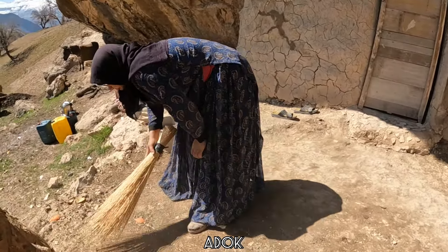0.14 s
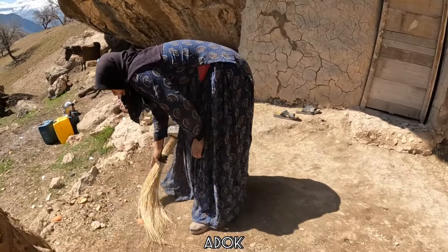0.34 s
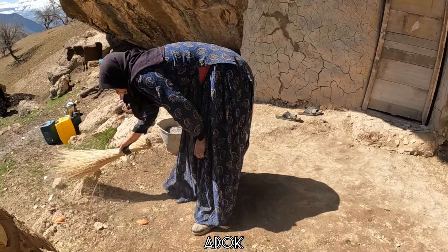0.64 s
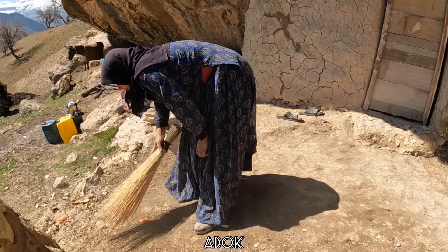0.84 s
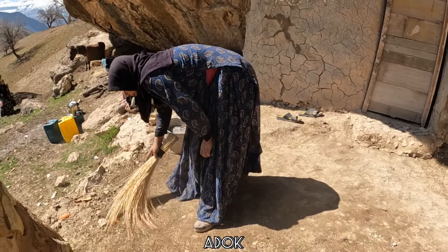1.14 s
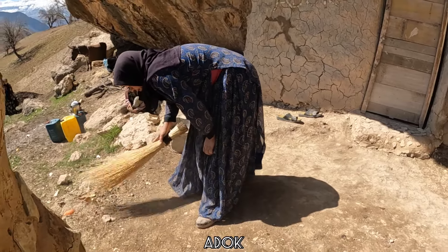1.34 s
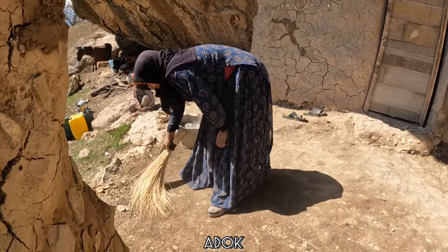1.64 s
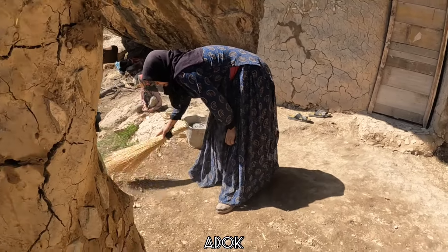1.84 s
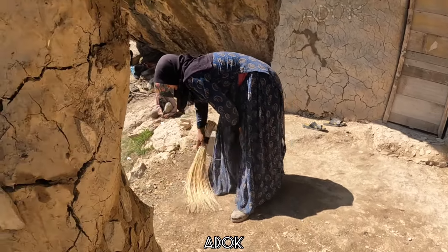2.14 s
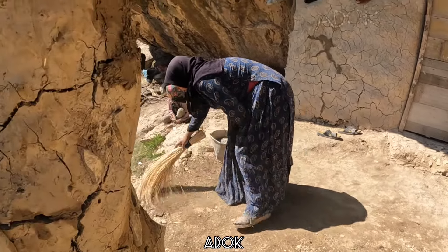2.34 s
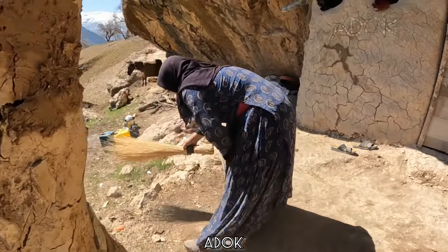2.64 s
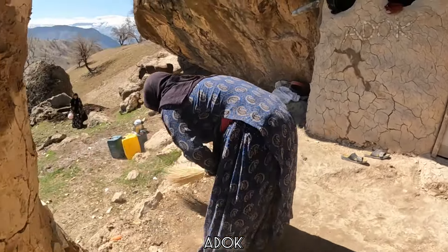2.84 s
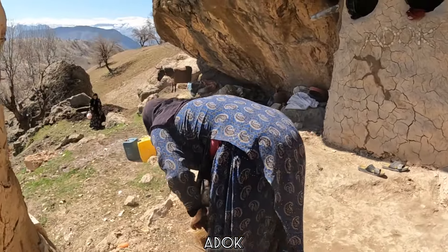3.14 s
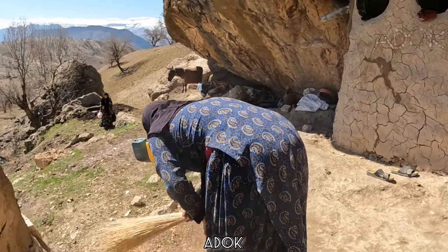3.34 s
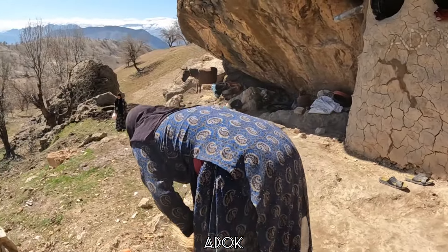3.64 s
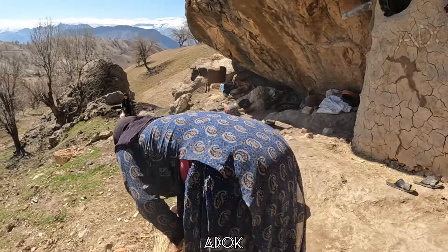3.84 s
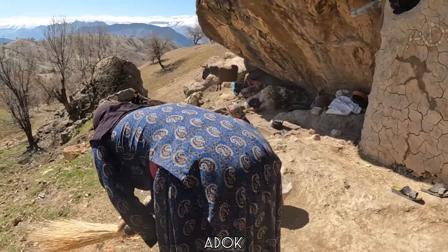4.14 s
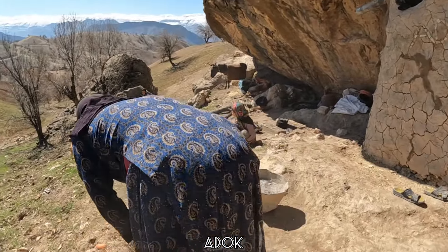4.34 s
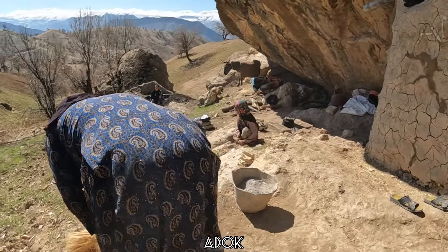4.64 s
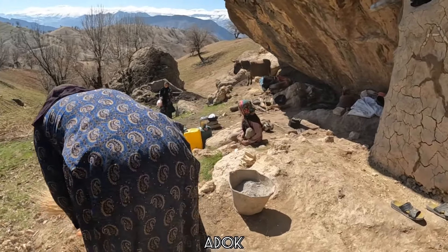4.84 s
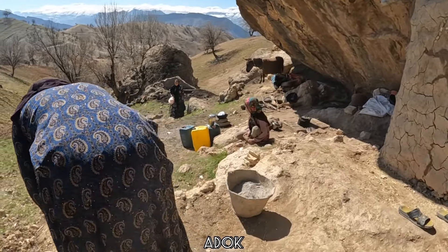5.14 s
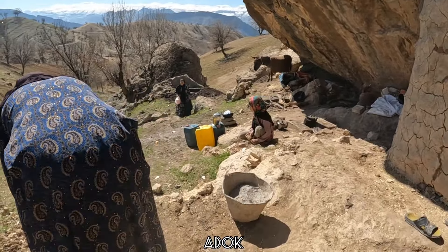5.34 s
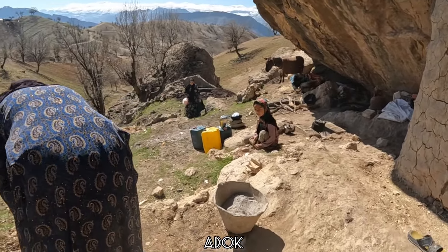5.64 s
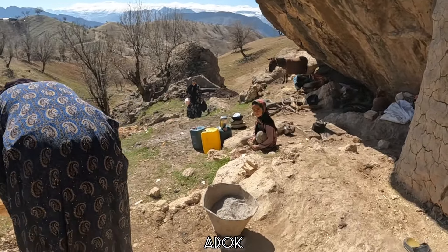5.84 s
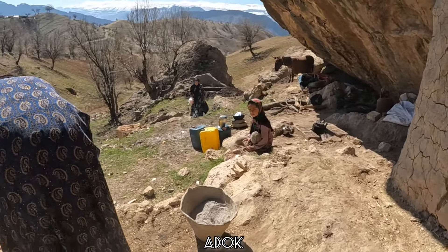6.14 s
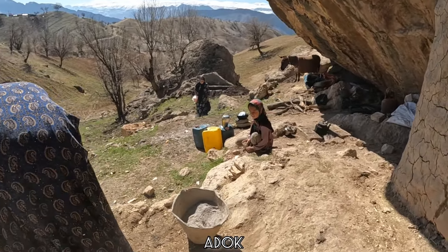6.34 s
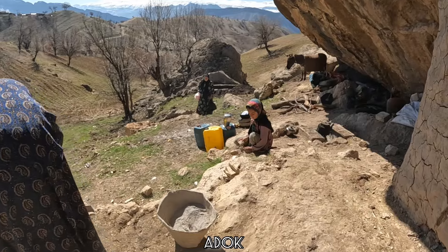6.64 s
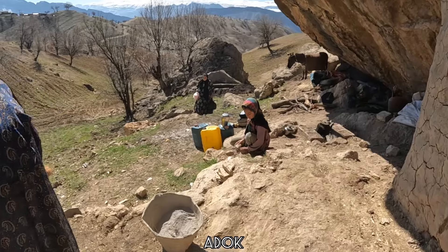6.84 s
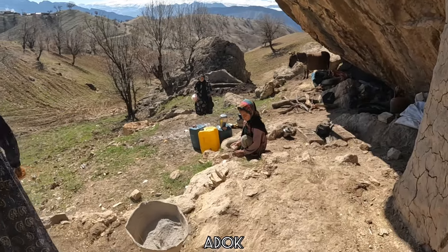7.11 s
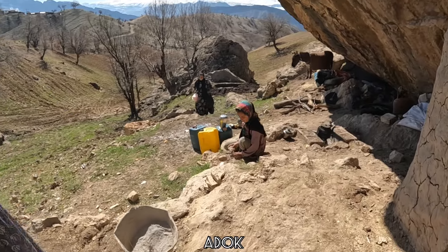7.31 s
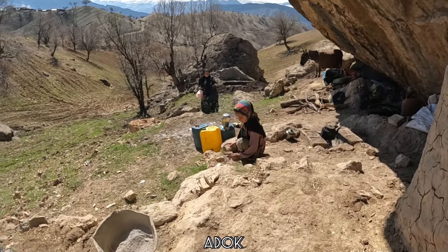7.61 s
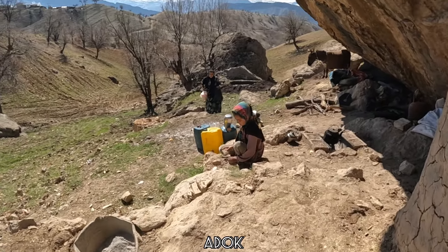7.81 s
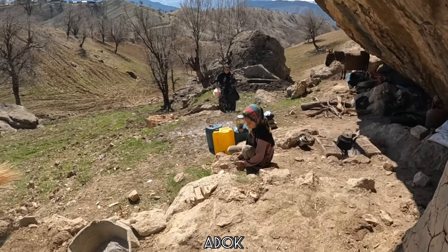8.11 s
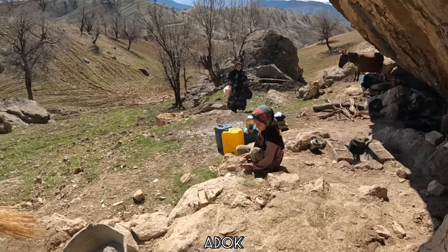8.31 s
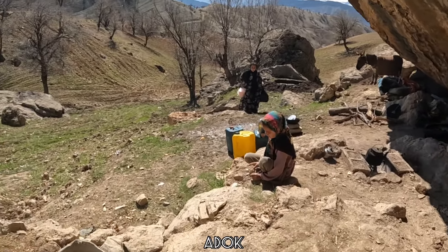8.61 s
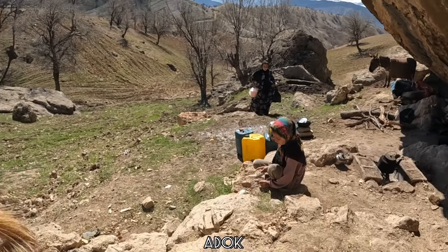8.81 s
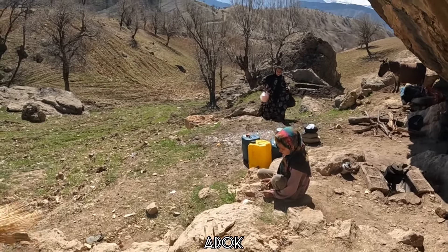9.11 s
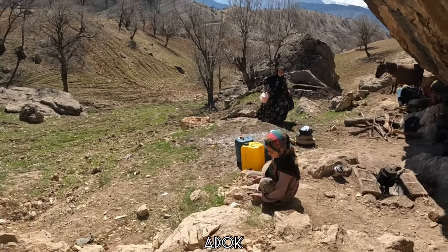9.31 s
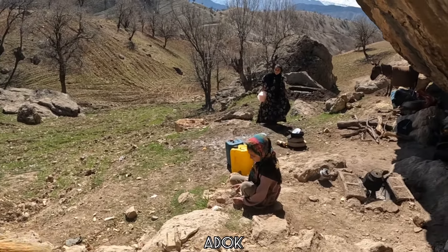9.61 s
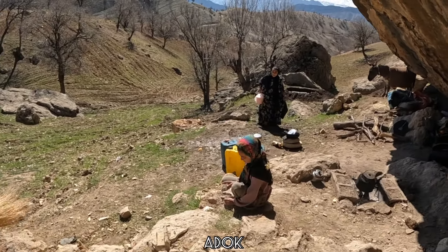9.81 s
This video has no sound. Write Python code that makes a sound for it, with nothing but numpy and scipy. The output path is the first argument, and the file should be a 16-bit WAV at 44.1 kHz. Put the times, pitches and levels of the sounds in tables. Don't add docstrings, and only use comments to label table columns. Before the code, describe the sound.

A short straw broom sweeps dry dirt in quick, scratchy strokes outdoors, with sharp pebble clicks, a few foot knocks and light wind buffeting.

```python
import sys
import numpy as np
from scipy import signal
from scipy.fft import rfft, irfft, next_fast_len
from scipy.io import wavfile
from scipy.ndimage import uniform_filter1d, map_coordinates

SR = 44100
rng = np.random.default_rng(int(sys.argv[2]) if len(sys.argv) > 2 else 0)


def unload_audio(sound):
    columns = np.transpose(np.atleast_2d(sound))
    steps = np.round(np.clip(columns, -1, 1) * 32767)
    wavfile.write(sys.argv[1], SR, steps.astype(np.int16))


def volts_from_db(level):
    exponent = np.asarray(level, float) / 20
    return 10 ** exponent


N = 439236

# straws land in seconds, hiss in dB, push ends in seconds, hiss in dB,
# then fade in dB per second.
STROKES = [(-.1, -44, 0.0, -45.5, 70), (0.327, -43, 0.645, -39, 95), (1.0, -48.5, 1.109, -43, 100),
           (1.19, -46, 1.27, -41.5, 100), (1.545, -47.5, 1.882, -43.5, 82), (2.16, -51.5, 2.33, -44, 200),
           (2.34, -44, 2.452, -43.5, 75), (3.115, -49.5, 3.34, -35.5, 125), (3.71, -51.5, 3.8, -50, 150),
           (3.82, -47, 3.871, -40, 55), (4.03, -47, 4.127, -38, 118), (4.492, -52.5, 4.6, -50, 100),
           (4.62, -47.5, 4.74, -39.5, 95), (5.066, -49.5, 5.382, -48.5, 55), (5.7, -50, 5.743, -44, 43),
           (6.218, -50, 6.338, -46.5, 78), (6.513, -47, 6.587, -46.5, 72), (6.89, -57, 7.03, -45, 100),
           (7.07, -46.5, 7.248, -49, 120), (7.55, -53, 7.675, -50, 150), (7.68, -48.5, 7.87, -49, 100),
           (8.68, -44, 8.74, -38.5, 50), (9.5, -51, 9.742, -41.5, 115)]
SLAPS = [
    (3.703, -52, 3.73, -51, 150),
    (5.624, -47.5, 5.66, -48.5, 100),
    (9.383, -44, 9.435, -41.5, 140),
]
# start in seconds, hiss in dB, fade in dB per second,
# extra grit in dB.
TOUCHES = [(.285, -53, 150, 0), (0.912, -45, 800, 3), (0.95, -52, 100, 3), (1.15, -52, 200, 8),
           (1.575, -54, 120, 7), (2.708, -60, 200, 13), (2.738, -57, 170, 11), (2.968, -59.5, 50, 4),
           (3.09, -58, 60, 2), (3.475, -48.5, 140, 0), (3.58, -58, 80, 3), (3.665, -61, 100, 4),
           (4.36, -55, 60, 0), (4.41, -52, 200, 4), (4.905, -53, 250, 0), (5.94, -55, 150, 0),
           (6.054, -57.5, 110, 3), (6.83, -59, 60, 0), (7.465, -61, 60, 3), (8.02, -58, 65, 2),
           (8.194, -46, 1200, 0), (8.225, -59, 75, -3), (8.435, -58, 70, 2), (8.645, -54, 150, 0),
           (9.01, -44.5, 90, 2), (9.135, -50, 95, -4), (9.273, -55, 60, 0), (9.83, -53, 120, 4)]
# time in seconds, coarseness in dB.
COARSENESS = [(0, -2.5), (.45, .3), (1.05, -2.5), (1.2, 2.5), (1.66, -3), (1.82, 1.5), (2.0, -2.5),
              (2.85, -1.5), (3.15, 1), (3.35, -.5), (3.9, -1.2), (4.65, 2.5), (4.93, -2.5), (5.2, 2.5),
              (6.2, -.3), (6.56, 4), (6.75, -.5), (9.96, -.3)]
# time in seconds, drag in dB.
CLODS = [(0, -2), (.42, 3), (.8, 0), (1.25, 3), (1.6, -3), (2.4, -1), (3.3, 3), (3.6, -2), (4.3, 2),
         (4.75, -2), (5.3, -4), (5.6, 0), (6.25, -6), (6.55, 2), (7.6, 0), (8.5, -1), (9.25, 3), (9.96, 0)]
# time in seconds, left over right in dB.
BROOM_PAN = [
    (0.0, 1.5),
    (2.58, 1),
    (8.02, 2.5),
    (8.21, 1.5),
    (8.54, 7),
    (9.96, 1.5),
]
# frequency in Hz, level in dB.
HISS_COLOUR = [(700, -42), (1500, -20.5), (3000, -4), (5000, -1), (7600, -0.5), (8300, -7), (10000, -36.5),
               (13000, -54)]
GRIT_COLOUR = [(300, -47), (600, -18), (880, -7), (1300, -2), (2000, -2), (3200, -3), (5000, -9.5),
               (8000, -37)]
FIZZ_COLOUR = [(3000, -60), (6000, -33), (8500, -3.5), (9700, -1.5), (10500, -6.5), (12500, -10),
               (14500, -21), (15700, -35)]
DRAG_COLOUR = [(80, -60), (150, -8), (300, -2.5), (500, -3), (800, -7), (1300, -20), (3000, -60)]
# peak in seconds, buffet in dB, swell and fade in dB per second.
GUSTS = [(0.46, -42, 30.0), (0.73, -31, 210.0), (1.46, -42, 90.0), (1.74, -49, 120.0), (1.89, -44, 190.0),
         (2.35, -47, 70.0), (2.85, -46, 120.0), (3.36, -50, 130.0), (3.81, -52, 110.0), (4.32, -48, 50.0),
         (4.69, -40, 140.0), (5.11, -48, 80.0), (5.34, -48, 30.0), (6.31, -44, 50.0), (6.62, -38, 130.0),
         (6.95, -39, 100.0), (7.19, -47, 60.0), (7.44, -46, 190.0), (7.81, -39, 190.0), (8.36, -49, 30.0),
         (8.6, -46, 80.0), (9.56, -43, 70.0), (9.75, -38, 190.0), (9.9, -39, 130.0)]
# peak in seconds, drone in dB.
JOLTS = [(0.44, -51.0), (0.64, -55.0), (0.91, -58.0), (0.99, -64.0), (1.15, -59.0), (1.84, -62.0),
         (2.18, -60.0), (2.46, -58.0), (3.28, -51.0), (3.97, -54.0), (4.36, -62.0), (4.54, -53.0),
         (4.66, -50.0), (5.29, -58.0), (5.62, -59.0), (6.27, -53.0), (6.58, -53.0), (7.01, -51.0),
         (7.4, -58.0), (7.56, -59.0), (8.2, -59.0), (8.44, -59.0), (8.72, -57.0), (9.17, -57.0),
         (9.61, -49.0), (9.9, -60.0)]
# frequency in Hz, level in dB.
BUFFET_COLOUR = [(5, -38), (14, -0.5), (26, 0), (40, -1), (62, -23), (100, -33.5), (160, -29), (300, -98)]
FLAP_COLOUR = [(30, -19), (60, 2), (90, -14.5), (140, -10.5), (300, -66)]
DRONE_COLOUR = [(60, -70), (90, -37), (130, -10), (190, 0.5), (260, -9), (400, -24), (800, -53)]
# frequency in Hz, density in dB per Hz.
HUSH_COLOUR = [(150, -48), (250, 2), (838, -2.5), (1050, 8), (1460, 11.5), (6000, -6), (12000, -35),
               (15600, -41)]
# start in seconds, peak in dB, pitch in Hz, left over right in dB,
# rattle off the rock in dB.
PEBBLES = [(0.088, -26.5, 6060, 1.5, -14), (0.19, -37, 6500, 2, -14), (0.6233, -18, 4000, 1.0, -22),
           (0.8914, -10, 4950, 3, -12), (0.9111, -23.5, 4150, -1.0, -7), (1.1289, -19.5, 3080, 4, -10),
           (1.1335, -27, 3300, 1, -14), (1.1494, -28, 3490, 0.0, -8), (2.7134, -37, 3000, 0, -8),
           (2.7243, -23.5, 2900, -1.0, -11), (2.9173, -33, 6030, 0.0, -17), (2.9656, -33, 4960, 2, 1),
           (5.0654, -32, 3500, .5, -2), (5.8524, -29, 4800, 2, -16), (5.9339, -28, 4930, 2.0, -14),
           (7.4819, -35, 7000, .5, -14), (8.4637, -35, 5500, 1.5, -18), (8.489, -39, 6270, 1.0, -22),
           (8.5105, -25, 3100, 3.5, -20), (9.7336, -30, 7550, 7, -2), (9.7454, -27, 5500, -3, -14)]
# start in seconds, peak in dB, pitch in Hz,
# left over right in dB.
TICKS = [(0.1654, -40, 4920, 2.0), (0.3227, -32, 1910, 0.5), (0.5501, -25, 3830, 1.0),
         (0.5994, -29, 5490, 1.0), (1.0894, -29, 2900, 0.5), (2.0138, -40, 6400, 1.5),
         (2.1534, -38, 5850, 0.5), (2.7034, -36, 1940, -1.5), (2.7067, -32, 2730, -0.5),
         (2.7344, -34, 2060, -2.0), (2.7384, -36, 1850, -1.0), (2.7614, -40, 2230, -1.0),
         (3.1018, -37, 2700, -0.5), (3.2271, -28, 6580, 0.5), (3.277, -23, 6550, 0.5),
         (3.3164, -23, 6410, 0.5), (3.3564, -23, 3110, 1.0), (3.48, -31, 3850, 0.0),
         (3.5473, -28.5, 5600, 1.0), (3.5774, -43, 2580, 1.0), (3.7015, -38, 6180, 1.0),
         (3.7095, -34, 3360, 0.0), (4.3345, -38, 3170, 1.0), (4.3585, -37, 5080, 0.5),
         (4.9212, -33, 8500, 3.0), (4.9304, -34, 5500, 2.5), (5.475, -35, 4760, 2.0),
         (6.0362, -38, 7030, 1.5), (6.0581, -40, 3610, 1.0), (6.2417, -32, 2440, 3.0),
         (6.4986, -35, 1710, 0.5), (6.565, -29, 2740, 1.0), (7.4215, -42, 5590, 1.0),
         (7.442, -32, 6010, 1.0), (8.0032, -39, 2170, 2.5), (8.6393, -36, 2250, 3.5),
         (9.3187, -38, 2910, 2.0), (9.3901, -26, 6530, 3.5), (9.4354, -26, 3600, 3.0),
         (9.5564, -32, 5600, 2.0), (9.8161, -31, 5590, 2.5)]
SPITS = [(2.799, -43, 4500, 0), (2.9264, -40, 10500, 0), (2.9414, -43, 9200, -2), (2.9464, -42, 9200, 1.5),
         (4.9212, -29, 5500, 3), (4.9304, -36, 9500, 2.5), (4.9362, -42, 9500, 2), (7.442, -32, 3500, 1),
         (7.454, -41, 3200, 1), (8.052, -43, 5000, 2), (8.191, -27, 3600, 2), (8.269, -44, 4500, 2),
         (8.291, -45, 10000, 2), (8.4637, -37, 6500, 2), (9.6005, -31, 9000, 2), (9.862, -40, 10000, 2),
         (9.916, -40, 1700, 1), (9.943, -42, 6000, 2)]
# start in seconds, middle mode in dB, then relative to it
# low mode in dB, woody mode in dB, crack in dB.
KNOCKS = [(0.316, -46, -27, -4, 8), (0.621, -34.5, -9.5, 0, -10), (1.127, -41, -23, 2, 6),
          (4.652, -30, -4, -10, -13), (4.657, -35, -4, -4, -10), (5.7975, -30, -12, -14, -20),
          (5.805, -35, -12, -6, -20), (6.442, -45, -21, -3, -4), (6.502, -48, -17, 7, -18),
          (6.9105, -49, -17, 4, -12), (7.249, -44, -24, 8, -8), (7.542, -54, -10, -10, 9),
          (8.1897, -33, -16, 2, 2), (8.7055, -34.5, -13.5, 5, -6), (9.151, -30, -12, 1, -6),
          (9.6, -24, -12, 3.5, 8.5), (9.602, -34, -12, 3, 9)]
# frequency in Hz, width in Hz.
GROUND_MODES = [(190, 50), (540, 300), (1150, 480), (2200, 1500)]
# peak in seconds, level in dB rms, pitch in Hz,
# length in seconds.
RUBS = [(0.437, -55, 216, 0.051), (0.58, -47, 9700, .03), (3.05, -60, 120, 0.084),
        (5.015, -66, 2200, 0.0036), (5.029, -66, 2150, .008), (5.052, -63, 1970, 0.01),
        (5.82, -53, 1100, 0.016), (5.84, -56, 1060, 0.02), (6.42, -59, 1850, .035),
        (6.578, -57, 1070, 0.026), (7.19, -53.5, 155, 0.052), (8.73, -58, 280, .03),
        (8.83, -58, 1850, 0.09), (8.9, -68, 286, .14)]
SHOVES = [(.47, -55, 70, .06), (.56, -53, 60, .05), (.73, -39, 30, .05), (1.12, -53, 25, .07),
          (1.46, -66, 70, .06), (1.56, -66, 80, .05), (1.75, -51, 18, .07), (1.87, -52, 14, .07),
          (2.24, -51, 15, .08), (3.33, -57, 30, .07), (3.86, -52, 15, .09), (4.33, -50, 15, .06),
          (4.54, -62, 100, .03), (5.32, -65, 65, .05), (5.37, -49, 15, .07), (5.61, -52, 16, .07),
          (6.14, -54, 16, .07), (6.62, -53, 62, .05), (7.0, -47, 15, .08), (7.81, -54, 25, .04),
          (8.55, -48, 15, .08), (8.64, -47, 15, .06), (8.76, -52, 25, .05), (9.56, -59, 70, .03)]
# start in seconds, peak in dB.
HEELS = [
    (.621, -41.5),
    (4.655, -48),
    (6.908, -56),
    (8.189, -42.5),
    (8.705, -40),
    (9.151, -42.5),
    (9.6, -32.5),
]
# start in seconds, peak in dB, pitch in Hz, 60 dB decay in seconds.
RINGS = [(.6245, -30, 2600, .006), (5.013, -44, 2200, .015), (5.038, -44, 2000, .03),
         (5.803, -38, 1100, .13), (5.814, -44, 205, .1), (5.81, -44, 1900, .06), (7.252, -46, 560, .06),
         (8.1915, -31, 1650, .01), (8.2, -45, 1520, .04), (8.199, -48, 2140, .05),
         (9.1515, -36, 1900, .012), (9.153, -38, 1220, .04), (9.6015, -23, 2500, .007),
         (9.602, -25, 720, .012), (9.607, -36, 1500, .05), (9.607, -36, 2400, .04)]
# start in seconds, peak in dB, left over right in dB,
# extra weight on the first mode in dB.
FLINT = [
    (6.176, -18.5, 5, 0),
    (6.1885, -42, 3, 8),
    (6.1915, -36, 3, 6),
    (6.198, -40, 3, 11),
    (6.2095, -42, 3, 4),
    (6.2125, -47, 3, 12),
]
# frequency in Hz, level in dB, 60 dB decay in seconds.
FLINT_MODES = [(5860, -12, 0.035), (7180, 1, 0.0089), (12300, -20, .004), (3900, 5, 0.0016)]
# frequency in Hz, 60 dB decay in seconds.
ROCK_DECAY = [(200, 0.11), (2000, 0.093), (6000, 0.063), (12000, 0.023)]
# frequency in Hz, likeness of left and right from 0 to 1.
LIKENESS = [(60, 0.86), (130, 0.88), (290, 0.76), (640, 0.74), (1410, 0.9), (3100, 0.81), (9000, 0.93),
            (14000, 0.3)]
# frequency in Hz, left over right in dB.
PORTS = [(60, -4.5), (180, -1.7), (550, -1.8), (1650, -1.8), (4970, -1.1), (15000, 3.6)]
# centre in Hz, width in Hz, depth from 0 to 1.
NOTCH = (828, 240, 0.48)


def unit(x):
    return x / np.sqrt(np.mean(x ** 2) + 1e-20)


def along(points, hz):
    f, v = np.transpose(points)
    return np.interp(np.log(hz + 1), np.log(f + 1), v)


def curve(rows):
    s, value = np.transpose(rows)
    return np.interp(np.arange(N) / SR, s, value)


def wobble(rate):
    steps = np.arange(0, N + 16, 16)
    knots = rng.standard_normal(N // 100)
    return np.interp(np.arange(N), steps, map_coordinates(knots, [steps * rate / SR]))


def filtered(x, response):
    m = next_fast_len(x.shape[-1] + 8192)
    return irfft(rfft(x, m) * response(np.fft.rfftfreq(m, 1 / SR)), m)[..., :x.shape[-1]]


def panned(db):
    return volts_from_db(np.array([db / 2, -db / 2]))


def add(track, s, sound):
    at = round(s * SR)
    track[:, at:at + sound.shape[1]] += sound[:, :N - at]


def swell(start, start_db, end, end_db, rises, fades):
    t = np.arange(0, N / SR + .01, .001)
    drift = np.interp(t, [start, end + 1e-4], [start_db, end_db])
    before = np.abs(rises) * np.maximum(start - t, 0)
    after = np.abs(fades) * np.maximum(t - end, 0)
    return volts_from_db(2 * (drift - before - after))


def level(power):
    return np.interp(np.arange(N) / SR, np.arange(len(power)) / 1000, 10 * np.log10(power))


def scratch(spectrum, spiky_db, clump_db, clump_hz, patchy_db, size=1):
    n = N // size
    hold = 12 // size
    force = np.repeat(rng.exponential(size=n // hold + 1), hold)[:n]
    sizes = volts_from_db(spiky_db * np.minimum(force, 4))
    sizes = sizes / np.sqrt(uniform_filter1d(sizes ** 2, size=4096 // size))
    sizes = sizes * volts_from_db(clump_db * wobble(clump_hz)[::size][:n])
    z = signal.stft((sizes * rng.standard_normal((2, n))).astype(np.float32), nperseg=256)[2]
    field = rng.standard_normal(z.shape[1:], np.float32)
    field = uniform_filter1d(uniform_filter1d(field, 5, 0), 8, 1)
    pair = signal.istft(z * volts_from_db(patchy_db * unit(field)), nperseg=256)[1][:, :n]
    m = next_fast_len(n + 1024)
    hz = np.fft.rfftfreq(m, size / SR)
    turn = np.arccos(np.clip(along(LIKENESS, hz), 0, 1)) / 2
    coloured = rfft(pair, m) * volts_from_db(along(spectrum, hz)) * [np.cos(turn), np.sin(turn)]
    mid, side = irfft(coloured, m * size)[:, :N]
    return unit(np.array([mid + side, mid - side]))


def overhang(x, wet_db, low_hz=40):
    hz, t, z = signal.stft(rng.standard_normal((2, SR // 5)), SR, nperseg=128)
    tail = signal.istft(z * volts_from_db(-60 * t / along(ROCK_DECAY, hz)[:, None]), SR, nperseg=128)[1]
    delay = np.arange(tail.shape[1]) / SR
    arrival = 0.9 + np.clip((delay - .008) / 0.0036, 0, 1)
    tail = (tail + 0.57 * tail[::-1]) * arrival
    thin = filtered(x, lambda f: 1j * f / (low_hz + 1j * f))
    wet = signal.fftconvolve(thin[None], tail / np.linalg.norm(tail[0]), axes=1)
    return np.pad(x, (0, wet.shape[1] - len(x))) + volts_from_db(wet_db) * wet


def broom():
    lifted_db, firm_push_db = -68, -44
    pushes = volts_from_db(2 * lifted_db)
    for rows, bite in ((STROKES, 480), (SLAPS, 4000)):
        pushes = pushes + sum(swell(*row[:4], bite, row[4]) for row in rows)
    touches = [swell(s, db, s, db, 3.5 * fades, fades) for s, db, fades, _ in TOUCHES]
    sprays = [power * volts_from_db(2 * row[-1]) for power, row in zip(touches, TOUCHES)]
    pressure_db = level(pushes + sum(touches))
    spray_db = level(pushes + sum(sprays)) - pressure_db
    firm_db = pressure_db - firm_push_db
    coarse_db = curve(COARSENESS) + spray_db
    grit_db = -5 - .17 * firm_db + coarse_db
    fizz_db = -6.4 + .12 * firm_db - .05 * np.arange(N) / SR
    drag_db = -21 - .38 * firm_db + 1.4 * coarse_db + curve(CLODS)
    sparse = 1 + 0.47 * np.clip(-firm_db / 12, 0, 1)
    hiss = volts_from_db(0.18) * scratch(HISS_COLOUR, 1.7 * sparse, clump_db=0.6, clump_hz=306, patchy_db=1.4)
    grit = volts_from_db(grit_db) * scratch(GRIT_COLOUR, 2.1 * sparse, clump_db=-2.0, clump_hz=118.9, patchy_db=1.8)
    fizz = volts_from_db(fizz_db) * scratch(FIZZ_COLOUR, 1.8 * sparse, clump_db=0.5, clump_hz=282, patchy_db=1.8)
    drag = volts_from_db(drag_db) * scratch(DRAG_COLOUR, 1.0, clump_db=3.0, clump_hz=38.8, patchy_db=3.0, size=6)
    flutter_db = 0.88 * wobble(35) + 0.44 * wobble(80)
    return (hiss + grit + fizz + drag) * volts_from_db(pressure_db + flutter_db) * panned(curve(BROOM_PAN))


def wind():
    breeze_db, still_db = -61, -68
    gusts = sum(swell(s, db, s, db, slope, slope) for s, db, slope in GUSTS)
    jolts = sum(swell(s, db, s, db, rises=280, fades=170) for s, db in JOLTS)
    buffet_db = level(volts_from_db(2 * breeze_db) + gusts)
    drone_db = level(volts_from_db(2 * still_db) + jolts)
    push = scratch(BUFFET_COLOUR, spiky_db=0.5, clump_db=2.5, clump_hz=4.4, patchy_db=1, size=12)
    push = push / np.sqrt(np.abs(uniform_filter1d(push.mean(axis=0) ** 2, size=4000)) + 0.79)
    flap = scratch(FLAP_COLOUR, spiky_db=1, clump_db=3, clump_hz=12, patchy_db=1, size=12)
    flap = volts_from_db(-23.5 + 1.23 * (buffet_db + 40.5)) * flap
    drone = scratch(DRONE_COLOUR, spiky_db=-0.5, clump_db=3.5, clump_hz=14, patchy_db=2, size=12)
    hush = scratch(HUSH_COLOUR, spiky_db=-0.5, clump_db=0.2, clump_hz=5, patchy_db=3)
    return volts_from_db(buffet_db + .3) * (push + flap) + volts_from_db(drone_db - 2.5) * drone + volts_from_db(-71.5) * hush


def pebbles():
    track, t = np.zeros((2, N)), np.arange(SR // 50) / SR

    def radiation(f):
        return ((1j * f / 1300) / (1 + 1j * f / 1300)) ** 2 / (1 + 1j * f / 14000) ** 2

    for s, db, hz, pan_db, rattle_db in PEBBLES:
        click = np.sin(2 * np.pi * hz * t) * (t * hz) ** 0.87 * np.exp(-t * hz / 0.46)
        click = filtered(click, radiation)
        click = overhang(click / np.abs(click).max(), rattle_db + 2)
        add(track, s + .0013, volts_from_db(db) * panned(pan_db)[:, None] * click)
    return track


def ticks(rows, t60, q, top_hz):
    track, t = np.zeros((2, N)), np.arange(SR // 100) / SR
    for s, db, hz, pan_db in rows:
        noise = rng.standard_normal((2, len(t)))
        burst = (noise[0] + .3 * noise) * volts_from_db(-60 * t / t60) * (1 - np.exp(-t / .0003))

        def resonance(f):
            width = 1j * f * hz / q
            return (width / (hz * hz - f * f + width)) ** 2 / (1 + (f / top_hz) ** 8)

        snap = filtered(burst, resonance)
        add(track, s + .0005, volts_from_db(db - 2) * panned(pan_db)[:, None] * snap / np.abs(snap).max())
    return track


def knocks():
    track, t = np.zeros((2, N)), np.arange(SR // 8) / SR
    for s, db, low_db, wood_db, crack_db in KNOCKS:
        softness = np.clip(-crack_db / 14, 0, 1.5)
        crumble = rng.standard_normal(len(t)) * volts_from_db(-60 * t / (0.0081 + 0.014 * softness))
        blow = (t == 0) * 8 / (1 + 0.5 * softness) + crumble
        knock, sign = 0, 1
        for (c, w), mode_db in zip(GROUND_MODES, (low_db, 0, wood_db, crack_db)):
            ring = filtered(blow, lambda f: 1j * f * w / (c * c - f * f + 1j * f * w)
                            / (1 + 1j * f / (1.5 * c)) ** 3)
            knock = knock + sign * volts_from_db(mode_db) * ring / np.abs(ring).max()
            sign = -sign
        add(track, s + 0.002036, volts_from_db(db) * overhang(knock, wet_db=-9, low_hz=900))
    return track


def rubs(rows):
    track = np.zeros((2, N))
    for s, db, hz, length in rows:
        u = np.arange(-2 * length, 2 * length, 1 / SR) / length
        noise = rng.standard_normal(len(u))
        tone = filtered(noise, lambda f: 1 / (1 + ((f - hz) / (0.066 * hz + 12)) ** 2))
        add(track, s - 2 * length, volts_from_db(db + 5) * unit(tone) * np.exp(-3.5 * u ** 2) * np.ones((2, 1)))
    return track


def heels():
    track, t = np.zeros((2, N)), np.arange(SR // 6) / SR
    cycles = 65 * t + 1.6 * (1 - np.exp(-t / .02))
    thump = np.sin(2 * np.pi * cycles) * volts_from_db(-60 * t / 0.12) * (1 - np.exp(-t / 0.0089))
    for s, db in HEELS:
        add(track, s + 0.002, volts_from_db(db) * overhang(thump, wet_db=-10.5))
    return track


def rings():
    track, t = np.zeros((2, N)), np.arange(SR // 8) / SR
    for s, db, hz, t60 in RINGS:
        drift = .03 * np.cumsum(rng.standard_normal(len(t)))
        tone = np.sin(2 * np.pi * hz * t + drift) * volts_from_db(db - 60 * t / t60) * (1 - np.exp(-t / .0006))
        add(track, s, tone * np.ones((2, 1)))
    return track


def flint():
    track, t = np.zeros((2, N)), np.arange(SR // 16) / SR
    first, *rest = [volts_from_db(db - 60 * t / t60) * np.sin(2 * np.pi * hz * t) for hz, db, t60 in FLINT_MODES]
    for s, db, pan_db, first_db in FLINT:
        ring = (volts_from_db(first_db) * first + sum(rest)) * (1 - np.exp(-t / 0.00035))
        add(track, s + 0.0011, volts_from_db(db) * panned(pan_db)[:, None] * overhang(ring, wet_db=-15))
    return track


def scene():
    sweeping = broom() + pebbles() + rubs(RUBS)
    sweeping += ticks(TICKS, t60=.0055, q=1.3, top_hz=9500) + ticks(SPITS, t60=.004, q=1.1, top_hz=12500)
    steps = knocks() + heels() + rings()
    air = wind() + rubs(SHOVES)
    return sweeping + steps + flint() + air


def low_pass(x):
    return signal.sosfilt(signal.butter(12, 15700, fs=SR, output="sos"), x)


def record(dry):
    top_hz = 15730
    c, w, depth = NOTCH

    def microphone(f):
        housing = 1 - np.clip(depth, 0, 1) * 1j * f * w / (c * c - f * f + 1j * f * w)
        return panned(along(PORTS, f)) * housing * (f < top_hz)

    return low_pass(filtered(dry, microphone))


dry = scene()
out = record(dry)
unload_audio(out)
```